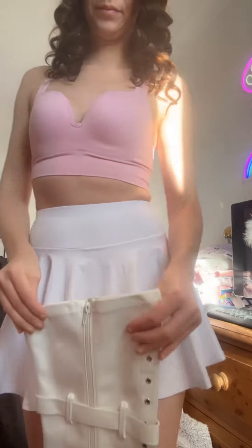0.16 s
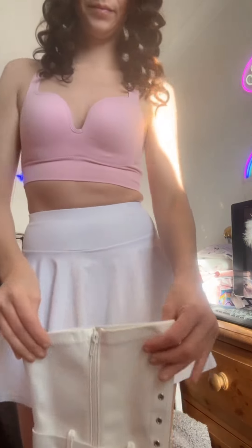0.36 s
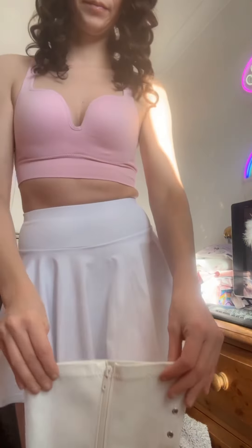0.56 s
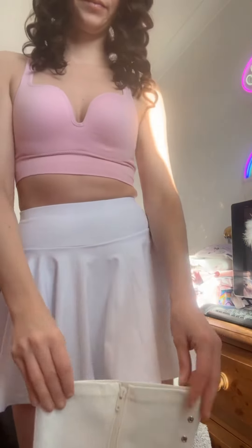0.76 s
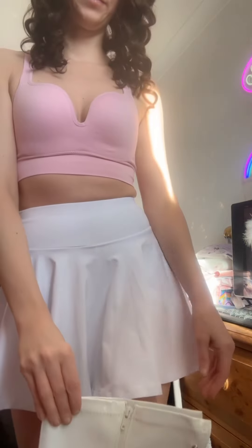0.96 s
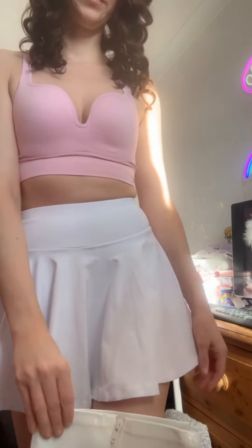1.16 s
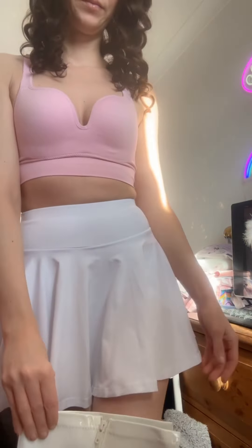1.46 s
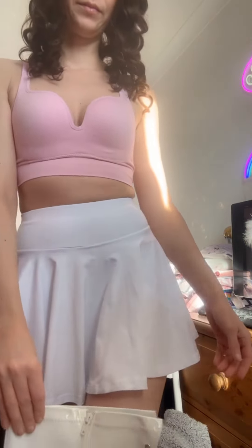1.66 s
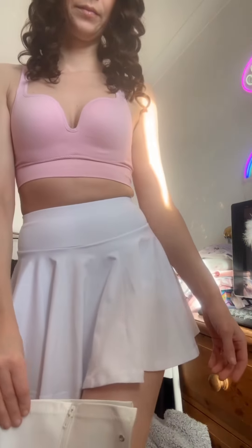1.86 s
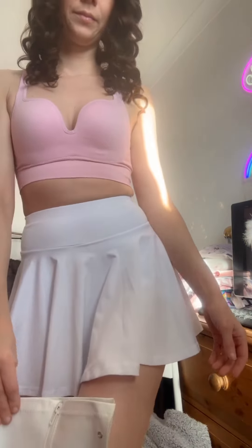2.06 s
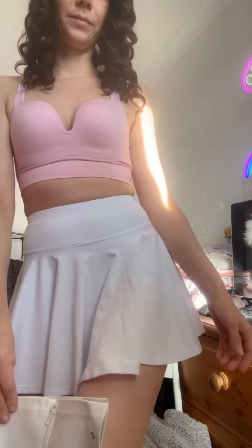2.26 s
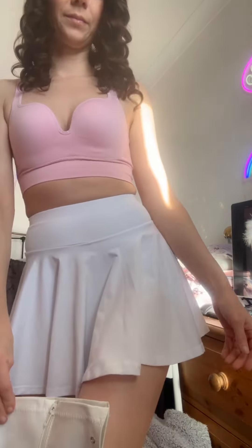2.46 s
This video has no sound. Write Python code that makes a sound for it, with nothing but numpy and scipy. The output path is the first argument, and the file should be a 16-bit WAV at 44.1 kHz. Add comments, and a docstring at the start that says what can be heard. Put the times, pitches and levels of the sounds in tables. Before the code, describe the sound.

A stiff shiny synthetic boot is handled close to the microphone in a small furnished room: crisp crease snaps and rustling, a heavy low thump early on, then sparser, quieter crackles and small knocks.

```python
"""A small furnished room: a stiff shiny synthetic boot is lowered and handled close to a phone microphone.
Creases snap as bursts of tiny clicks; the shaft rustles through the material's broad resonances,
rubs as coloured noise and knocks as short scuffs ringing on two pitches. Early on a heavy low
wobble, a gliding sine, swells and dies, with soft bumps ringing a hollow body at its height.
Feedback delays give the boot a short room tail; steady coloured noise is the room's quiet air."""
import sys
import numpy as np
from scipy import signal
from scipy.fft import rfft, irfft, next_fast_len
from scipy.io import wavfile
from scipy.ndimage import uniform_filter1d

SR = 44100
rng = np.random.default_rng(int(sys.argv[2]) if len(sys.argv) > 2 else 0)


def dump(signal):
    """Clip the signal to [-1, 1] and save it as 16-bit WAV at the path in sys.argv[1]."""
    limited = np.clip(np.atleast_2d(signal).T, -1, 1)
    pcm = np.round(limited * 32767).astype(np.int16)
    wavfile.write(sys.argv[1], SR, pcm)


N = 114660

# broad resonances of the boot material, low to high: [f/Hz, width/Hz, level/dB per Hz (rustle only)]
SKIN = [(1635, 2290, -11.5), (4360, 2010, 0.5), (8480, 3520, 2.5), (13910, 4940, -1)]


def from_db(db):
    """Decibels to gain."""
    return 10 ** (np.asarray(db) / 20)


def rms_one(x):
    """Scale to rms 1."""
    return x / np.sqrt(np.mean(x ** 2) + 1e-20)


def in_time(rows):
    """Columns of a curve against time, drawn as one value per sample."""
    s, *columns = np.transpose(rows)
    return [np.interp(np.arange(N) / SR, s, c) for c in columns]


def drift(rate_hz):
    """Slow random wander, rms 1: white noise through two equal low-pass poles."""
    r = np.exp(-2 * np.pi * rate_hz / SR)
    wander = signal.lfilter([1], [1, -2 * r, r * r], rng.standard_normal(N + SR))
    return rms_one(wander[SR:])  # the first second lets the filter settle


def ring(clicks, hz, t60):
    """A two-pole resonator: a unit click sets a dying sine of starting height 1 ringing."""
    r, w = from_db(-60 / (t60 * SR)), 2 * np.pi * hz / SR
    # the tiny offset keeps the filter away from denormal numbers
    return signal.lfilter([0, np.sin(w)], [1, -2 * r * np.cos(w), r * r], clicks + 1e-18)


def broad(x, hz, width_hz):
    """A wide steep resonance; white noise of rms 1 keeps rms near 1."""
    edges = np.clip([hz - width_hz / 2, hz + width_hz / 2], 50, .48 * SR)
    band = signal.butter(2, edges, "band", fs=SR, output="sos")
    return signal.sosfilt(band, x) * np.sqrt(SR / 2 / width_hz)


def coloured(spectrum):
    """Noise with the given spectrum, rms 1."""
    hz, db = np.transpose(spectrum)
    f = np.arange(1, N // 2 + 2) * SR / N
    gain = from_db(np.interp(np.log(f), np.log(hz), db, right=-90))
    return rms_one(irfft(rfft(rng.standard_normal(N)) * gain, N))


def grains(spread_db):
    """Uneven click sizes with random sign, rms 1."""
    sizes = from_db(spread_db * np.minimum(rng.exponential(1, N), 4))
    return rms_one(sizes * rng.choice([-1, 1], N))


def snaps():
    """A buckling crease gives a sudden dying burst of tiny clicks, coloured by the material."""
    # creases: [t/s, level/dB, lowest resonance/dB and second resonance/dB against level, t60/s]
    creases = [(0.1208, -16.5, -46, -20, 0.033), (0.1911, -21, -39, -15, 0.04),
               (0.2177, -21, -25, -15, 0.027), (0.2951, -15.5, -18.5, -13, 0.011),
               (0.3537, -24.5, -41, -18, 0.022), (0.3687, -21, -31, -16.5, 0.068),
               (0.389, -17.5, -18, -16, 0.031), (0.4474, -23, -31, -20, 0.028),
               (0.4718, -21.5, -30, -13.5, 0.081), (0.5447, -16.5, -31.5, -25, 0.038),
               (0.558, -13, -21.5, -26, 0.064), (0.5741, -12.5, -30, -20, 0.035),
               (0.6448, -20, -20, -10.5, 0.019), (0.6595, -18.5, -43, -19, 0.0083),
               (0.666, -15, -46, -18, 0.01), (0.68, -22.5, -26, -12.5, 0.045),
               (0.754, -22.5, -45, -15, 0.053), (0.8088, -23.5, -42, -17.5, 0.018),
               (0.815, -20, -31, -20, 0.024), (0.8494, -20, -28, -13, 0.031),
               (0.9564, -16, -22, -18, 0.012), (1.0104, -22.5, -18.5, -13.5, 0.053),
               (1.0187, -21.5, -17.5, -13.5, 0.024), (1.0229, -20, -25, -15.5, 0.03),
               (1.0507, -24, -25, -10, 0.036), (1.089, -18, -24.5, -27, 0.043),
               (1.1234, -20.5, -27, -32, 0.029), (1.2065, -25.5, -22, -15, 0.051),
               (1.241, -27, -27, -18, 0.043), (1.2892, -18, -31.5, -21.5, 0.023),
               (1.3544, -25, -41, -42, 0.032), (1.378, -28.5, -18.5, -12, 0.038),
               (1.404, -37, -17.5, -14, 0.096), (1.423, -30.5, -20, -18, 0.038),
               (1.493, -38, -34, -14, 0.013), (1.518, -30.5, -44, -23, 0.015),
               (1.5243, -34.5, -38, -18, 0.015), (1.5378, -36.5, -37, -11, 0.027),
               (1.5511, -35.5, -23, -13, 0.026), (1.602, -29.5, -39, -15.5, 0.022),
               (1.635, -46.5, -9, -4.5, 0.025), (1.6835, -30.5, -24, -17, 0.02),
               (1.7493, -37, -25, -26, 0.03), (1.8164, -30.5, -16, -9, 0.022), (1.838, -35, -35, -10, 0.02),
               (1.8492, -27.5, -43, -36, 0.015), (1.8608, -30, -20, -13, 0.025),
               (1.9, -22, -24, -13, 0.024), (1.9357, -29.5, -47, -14, 0.035),
               (1.9638, -25.5, -19, -15, 0.032), (1.9926, -35, -13, -11.5, 0.096),
               (2.051, -40.5, -7.5, -6.5, 0.028), (2.069, -36, -18, -13.5, 0.046),
               (2.094, -33.5, -18.5, -14.5, 0.063), (2.2224, -17, -25.5, -15.5, 0.04),
               (2.2275, -28.5, -16, -12.5, 0.031), (2.3348, -29, -38, -17, 0.021),
               (2.386, -41, -18, -11.5, 0.072), (2.4112, -30, -18, -13.5, 0.063),
               (2.4432, -31, -31, -15.5, 0.035), (2.5135, -23.5, -37, -24, 0.027)]
    third_db, top_db = -11, -12.5  # upper two resonances against level
    gain_db, grain_spread_db = 1, 5
    crack = 1.58  # first click against the rms grain
    rise_s = .00015
    edge_db, edge_t60_s = 12.5, .0039  # sharper first edge, strongest on short snaps

    t, rough = np.arange(N) / SR, grains(grain_spread_db)
    envelopes = np.zeros((4, N))
    for s, db, lowest_db, second_db, t60 in creases:
        rough[int((s + 2 * rise_s) * SR)] = crack
        start = int(s * SR)
        u = t[start:start + 6000] - s
        rise = 1 - np.exp(-np.maximum(u, 0) / rise_s)
        decay = from_db(-60 * u / max(t60, .004))
        edge = edge_t60_s / t60 * from_db(edge_db - 60 * u / edge_t60_s)
        levels_db = db + gain_db + np.array([lowest_db, second_db, third_db, top_db])
        envelopes[:, start:start + len(u)] += np.outer(from_db(levels_db), rise * (decay + edge))
    out = 0
    for envelope, (hz, width_hz, _) in zip(envelopes, SKIN):
        out = out + broad(envelope * rough, hz, width_hz)
    return out


def rustle():
    """Clumped grains and small ticks through the material's resonances, over a duller rub."""
    # handling of the shaft: [t/s, treble rustle level/dB, rub level/dB]
    handling = [(0, -41, -47.5), (.27, -39.5, -42), (.33, -48.5, -47.5), (.4, -41.5, -43), (.53, -40, -46),
                (.56, -25.5, -42), (.6, -33.5, -40.5), (.68, -37.5, -48), (.72, -41, -49.5),
                (.795, -48.5, -54), (.84, -40.5, -49.5), (.93, -33.5, -43), (.985, -40.5, -51.5),
                (1.03, -37.5, -47), (1.16, -38.5, -49.5), (1.22, -47.5, -54.5), (1.35, -49, -56.5),
                (1.47, -66, -63.5), (1.65, -66.5, -66), (1.77, -55.5, -58), (1.99, -60, -59.5),
                (2.2, -61, -62), (2.29, -61.5, -63.5), (2.48, -61, -61), (2.52, -44.5, -56.5),
                (2.6, -45, -52.5)]
    # colour of the rub: [f/Hz, level/dB per Hz]
    rub_colour = [(35, -24), (60, -3.5), (183, -0.5), (381, -2.5), (1530, -3), (3000, -5.5), (3900, -21)]
    grains_per_s, grain_spread_db = 8000, 3.5
    clump_db, clumps_hz = 2.5, 40  # spread and drift rate
    ticks_per_s, tick_db, tick_t60_s, tick_colour_db = 200, -7, .004, 4
    rub_patchy_db, rub_patch_hz = 2.5, 33.6

    treble_db, rub_db = in_time(handling)
    fine = rms_one(grains(grain_spread_db) * (rng.random(N) < grains_per_s / SR))
    tick_sizes = from_db(tick_db + 2.5 * rng.standard_normal(N))
    starts = (rng.random(N) < ticks_per_s / SR) * tick_sizes
    tick_decay = from_db(-60 / (tick_t60_s * SR))
    clumps, skin = from_db(clump_db * drift(clumps_hz)), 0
    for hz, width_hz, db in SKIN:
        # every tick has its own balance of resonances
        coloured_starts = starts * from_db(tick_colour_db * rng.standard_normal(N))
        ticks = signal.lfilter([1], [1, -tick_decay], coloured_starts + 1e-18)
        level = from_db(db + 1.23 * drift(25.0)) * np.sqrt(width_hz)
        skin = skin + level * broad(fine * (clumps + ticks), hz, width_hz)
    # the ticks of the top resonance also shake the rub
    rub = rms_one(coloured(rub_colour) * (from_db(rub_patchy_db * drift(rub_patch_hz)) + ticks))
    return from_db(treble_db) * rms_one(skin) + from_db(rub_db) * rub


def knocks():
    """A soft dull knock in the shaft: a short uneven scuff rings briefly on two close pitches."""
    # knocks: [t/s, level/dB, f/Hz]
    hits = [(1.101, -36.5, 205), (1.584, -52.5, 775), (1.718, -38.5, 2620), (1.796, -40.5, 780),
            (1.976, -40, 600), (1.979, -33, 1490), (2.002, -36, 1140), (2.007, -40.5, 197),
            (2.179, -36.5, 1200), (2.232, -42, 477), (2.269, -44, 1150), (2.302, -42, 1190),
            (2.3165, -34, 1275), (2.3165, -35.5, 2620)]
    ring_factor = 14.5  # t60 falls with the square root of pitch: 14.5 ms at 1 kHz
    partner_ratio, partner_db = 1.37, -13.5
    scuff_t60_s = .023
    body_cut_hz = 84  # small bodies give off little below

    out, u = 0, np.arange(900) / SR
    for s, db, hz in hits:
        scuff = rng.standard_normal(len(u)) * from_db(-60 * u / scuff_t60_s)
        start = int(s * SR)
        push = np.zeros(N)
        push[start:start + len(u)] = from_db(db) * scuff / np.sqrt(np.sum(scuff ** 2))
        t60 = ring_factor / np.sqrt(hz * 1000)
        out = out + ring(push, hz, t60)
        out = out + from_db(partner_db) * ring(push, hz * partner_ratio, t60)
    return signal.sosfilt(signal.butter(2, body_cut_hz, "high", fs=SR, output="sos"), out)


def bumps():
    """Soft-edged bumps set the resonances of a hollow body ringing."""
    # bumps: [t/s, level/dB]
    hits = [(.14, -43), (.175, -33.5), (.212, -22), (.243, -22.5), (.262, -19), (.298, -24.5), (.33, -33),
            (0.379, -37.5)]
    # resonances of the hollow body: [f/Hz, level/dB against the bump, t60/s]
    hollow = [(128, -9, 0.14), (174, -10, 0.12), (206.7, -3, 0.18), (223.2, -2, 0.18), (299.6, -11, 0.26),
              (342.7, -9.5, 0.2), (413, -16, 0.2), (507, -15, 0.087), (634, -12, 0.047), (905, -12, 0.022),
              (1104, -23, 0.19)]
    spread_db = 2.5
    push_cycles = 7.7  # the push dies by 60 dB in this many cycles, so the ringing swells in

    s, bump_db = np.transpose(hits)
    out = 0
    for hz, db, t60 in hollow:
        clicks = np.zeros(N)
        levels_db = bump_db + db + spread_db * rng.standard_normal(len(s))
        clicks[(s * SR).astype(int)] = from_db(levels_db)
        push = ring(clicks, hz, push_cycles / hz)
        # offsets the gain of two resonators in a row
        out = out + ring(push, hz, t60) * 2 * np.log(1000) * hz / (push_cycles * SR)
    return out


def wobble():
    """A heavy low swing, one sine of gliding pitch, swells and dies."""
    # wobble: [t/s, f/Hz, rms level/dB]
    swing = [(0, 66, -51), (.09, 66.3, -40), (.165, 64.7, -26), (.225, 60.99, -23), (.27, 57.8, -24.5),
             (.325, 59, -24), (.365, 62.5, -27), (.41, 62.84, -40), (.47, 65, -45), (.53, 67, -74)]
    hz, db = in_time(swing)
    on = np.arange(N) < swing[-1][0] * SR
    gate = uniform_filter1d(on * 1., size=900)  # soft switch-off
    return np.sqrt(2) * from_db(db) * gate * np.sin(2 * np.pi * np.cumsum(hz) / SR)


def room(x):
    """Reflections of the furnished room: eight feedback delays, duller on every round."""
    t60_s, wall_cut_hz = .093, 8100
    size = next_fast_len(N + SR)
    f = np.arange(size // 2 + 1) * SR / size
    tail = 0
    for k, lag_s in enumerate(rng.uniform(.008, .03, 8)):
        wall = from_db(-60 * lag_s / t60_s) / (1 + 1j * f / wall_cut_hz)
        loop = wall * np.exp(-2j * np.pi * f * lag_s)
        tail = tail + (-1) ** k * loop / (1 - loop)
    return irfft(rfft(x, size) * tail, size)[:N]


def room_tone():
    """The room's quiet air: steady coloured noise."""
    # colour of the air: [f/Hz, level/dB]
    air = [(15, -23), (25, 20), (92, 31.5), (568, 10), (787, -21), (5570, 11.5), (7300, -7), (11300, -48),
           (14000, -23), (16500, -33)]
    return from_db(-65.5) * coloured(air)


def scene():
    """The boot and its room tail, then bumps and wobble, over quiet air."""
    room_db = -15
    boot = snaps() + rustle() + knocks()
    mix = boot + from_db(room_db) * room(boot) + bumps() + wobble() + room_tone()
    return mix[None]


def record(dry):
    """Everything above about 16.6 kHz is steeply removed, 70 dB down."""
    return signal.sosfilt(signal.cheby2(12, 70, 16600, fs=SR, output="sos"), dry)


dry = scene()
out = record(dry)
dump(out)
```